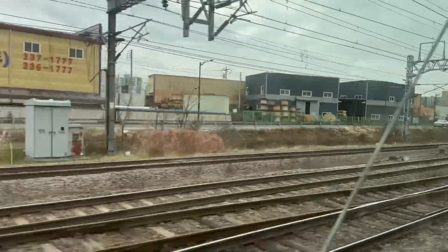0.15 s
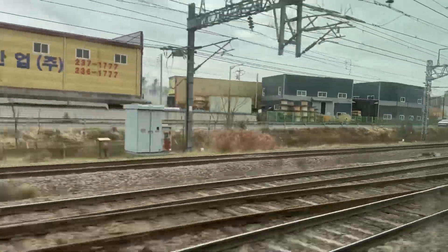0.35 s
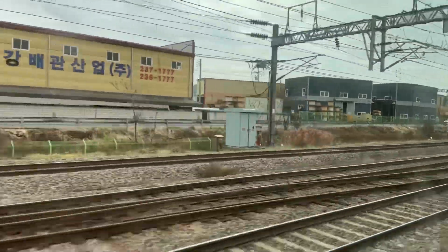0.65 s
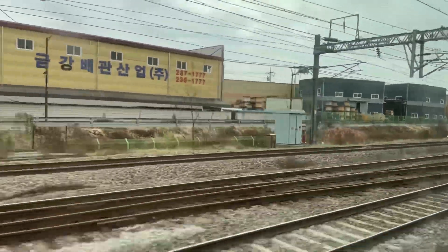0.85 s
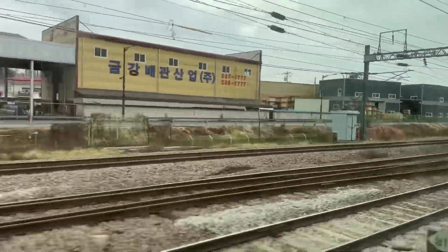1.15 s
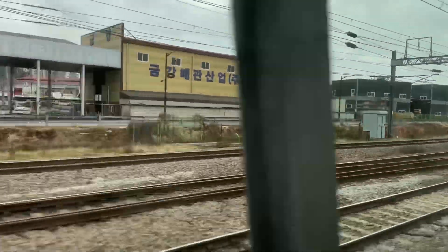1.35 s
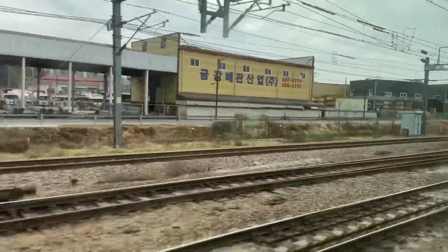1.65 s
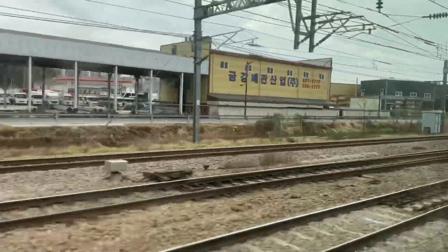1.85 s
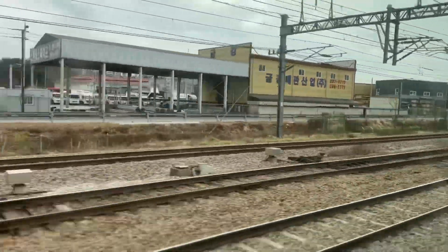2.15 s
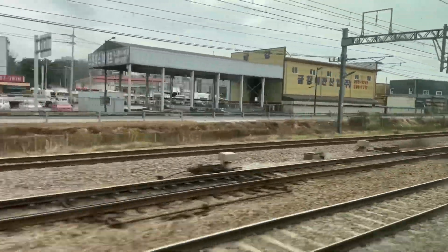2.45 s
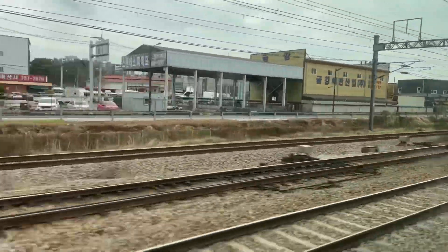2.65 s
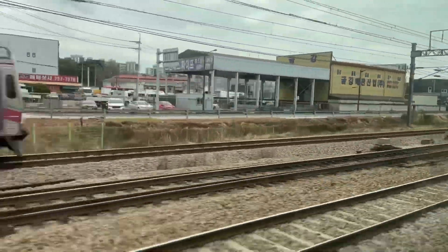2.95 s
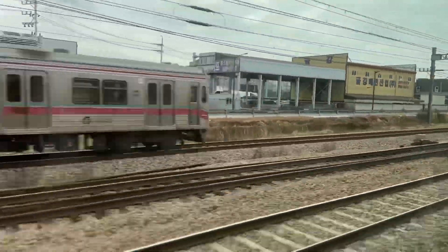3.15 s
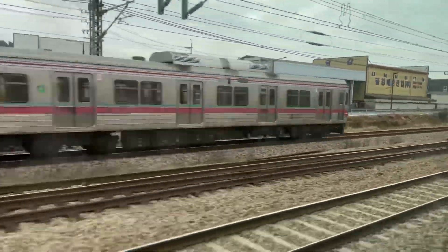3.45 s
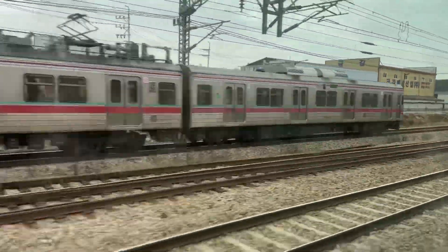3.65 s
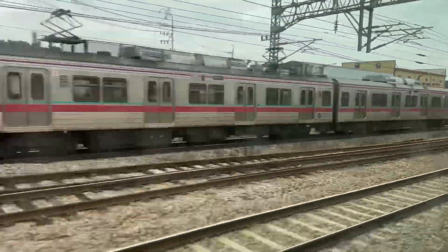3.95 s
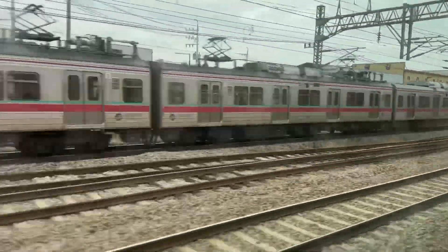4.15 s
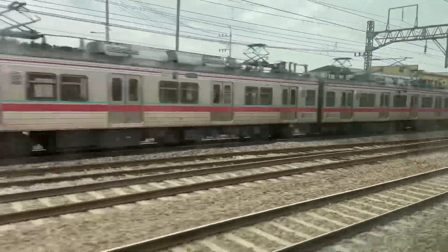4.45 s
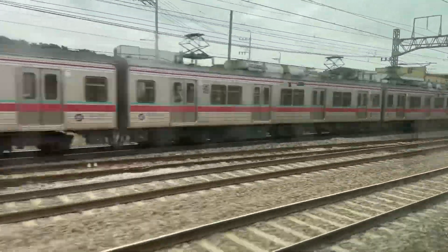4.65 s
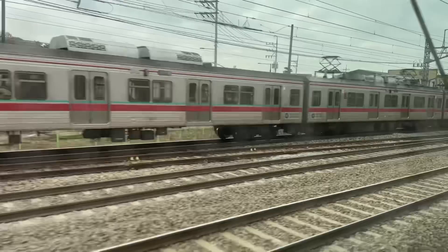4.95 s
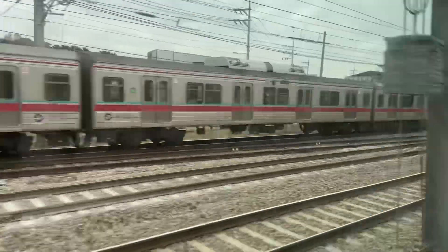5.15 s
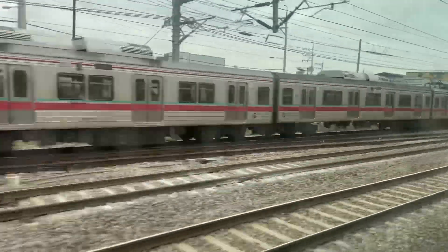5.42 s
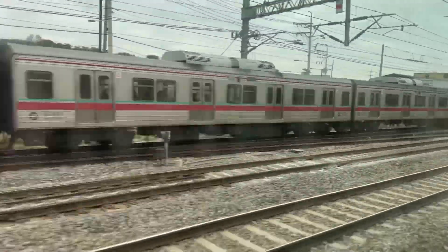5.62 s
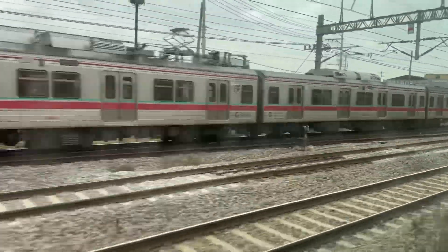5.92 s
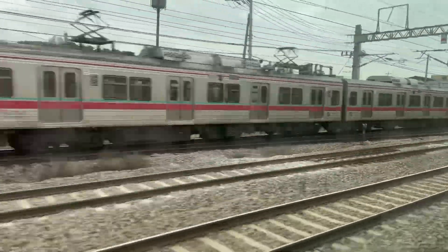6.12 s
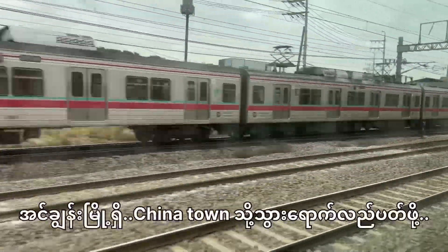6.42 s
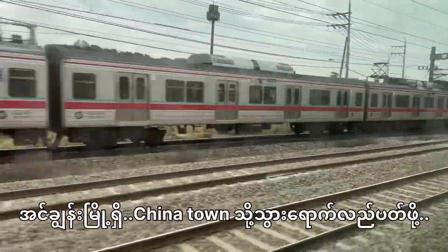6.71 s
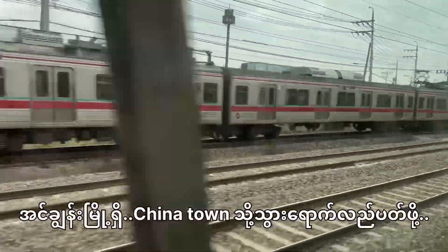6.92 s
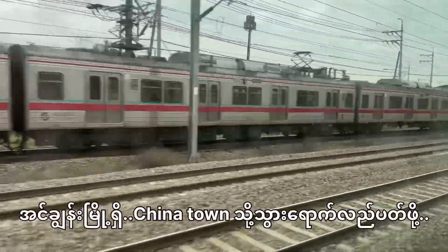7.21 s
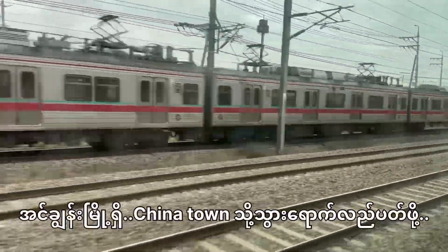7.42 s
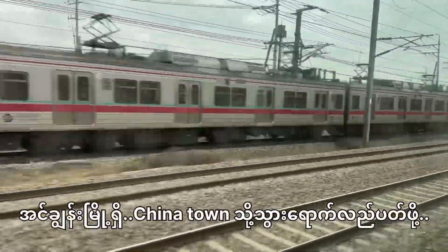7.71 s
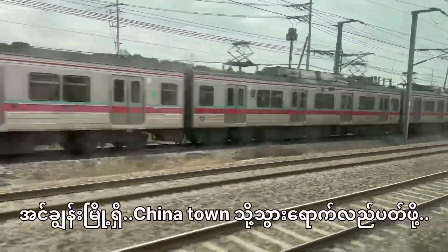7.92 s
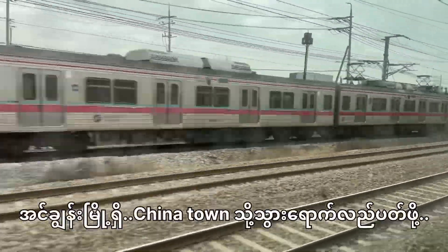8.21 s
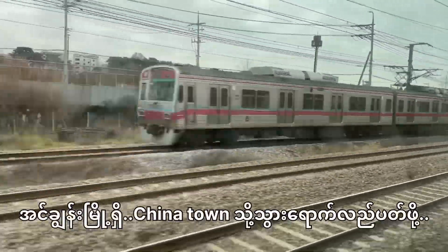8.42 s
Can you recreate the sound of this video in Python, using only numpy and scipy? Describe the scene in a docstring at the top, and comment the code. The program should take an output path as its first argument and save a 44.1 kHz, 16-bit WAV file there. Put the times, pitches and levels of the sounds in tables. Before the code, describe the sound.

A train gathers slight speed, heard from a seat inside. Bass-heavy rolling noise with floor boom surges gently under a faint, slowly climbing gear whine and wavering body hum. Paired thuds with soft steel clanks punctuate it irregularly. Small metal ticks and faint rustling join midway, then a brief high squeak slightly left. After a lull in joint knocks, a dense clatter and shudder closes over the ongoing rumble. Stereo, enclosed, little treble.

```python
"""Inside a passenger train that gathers a little speed: filtered noise makes the rolling, sines the tones.
At first a low drone tied to the wheel speed swells in, and soon wheels knock over rail joints, often in pairs.
From about 3 s loose fittings tick and jingle; near 4 s the drone changes pitch and soft rustles begin.
A panel squeaks just after 6 s, the joints pause from 7 s, and after 8 s they crowd as the body shudders.
All along, the gears whine and beat while climbing slowly, and the body hums with wavering strength."""
import sys
import numpy as np
from scipy import signal
from scipy.fft import irfft
from scipy.io import wavfile
from scipy.ndimage import uniform_filter1d, map_coordinates

SR = 44100
rng = np.random.default_rng(int(sys.argv[2]) if len(sys.argv) > 2 else 0)


def pcm_store(signal):
    """Save signal as 16-bit PCM."""
    levels = np.round(np.clip(np.atleast_2d(signal), -1, 1) * 32767)
    wavfile.write(sys.argv[1], SR, levels.astype(np.int16).T)


N = 377937
TIME = np.arange(N) / SR  # seconds
FREQ = np.maximum(np.arange(N // 2 + 1) * SR / N, 1)  # Hz, kept above zero for the logarithm

# Rolling: rocking of the carriage on its springs: t/s, shudder level/dB
SHUDDER_LEVEL = [(0, -32), (0.36, -29), (1.2, -40.5), (2.6, -33), (3.3, -42), (4.7, -35.5), (6.8, -36.5),
                 (7.8, -37), (8.25, -24), (8.57, -37)]
# long waves in the track: t/s, rumble level/dB
RUMBLE_LEVEL = [(0, -22), (0.6, -26), (1.2, -24.5), (1.9, -22.5), (2.8, -25), (3.3, -25.5), (3.75, -20),
                (4.2, -29.5), (4.8, -24), (5.6, -21), (6.4, -23), (7.1, -22), (7.7, -23.5), (8.57, -21.5)]
# shorter waves in the track: t/s, floor boom level/dB
BOOM_LEVEL = [(0, -31.5), (0.8, -26.5), (2.0, -27.5), (2.8, -27), (4.15, -27.5), (4.7, -24.5), (5.3, -24.5),
              (5.8, -23.5), (6.5, -24), (7.1, -23), (7.8, -26.5), (8.3, -22)]
# ringing wheels as they leak in: t/s, level/dB before WHEEL_RING_TRIM_DB
WHEEL_RING_LEVEL = [(0.0, -50.5), (0.58, -47), (1.75, -48.5), (2.9, -47), (3.6, -46), (4.6, -47),
                    (6.6, -47.5), (8.4, -48.5)]
# hiss that leaks in: t/s, level/dB before HISS_TRIM_DB
HISS_LEVEL = [(0.0, -59), (0.44, -57), (1.8, -57.5), (4.4, -55), (8.4, -55)]
# colour of the noise in the cabin: f/Hz, relative level per Hz/dB
CABIN_COLOUR = [(18, -36.5), (30, -30.5), (42, -6), (66, -1), (186, -7), (226, -10.5), (340, -17.5),
                (450, -22), (1050, -32), (1400, -35.5), (2200, -39.5), (3200, -49), (7200, -56),
                (9700, -67), (11500, -108)]
# resonances of the body and, higher up, of the wheels: f/Hz, width at half the lift/Hz, lift/dB
CABIN_RESONANCES = [(104.6, 11, -5), (178.6, 8.9, -0.5), (260, 48, -1.5), (364.3, 15, 5), (386, 17, -2),
                    (432, 14, 0.5), (587, 14, 4.5), (675, 41, -0.5), (901, 29, 3.5), (2163, 120, -1),
                    (2855, 220, 4), (3560, 210, 2)]
# how the ears differ: f/Hz, likeness/0-1, left minus right level/dB, lead of the left ear/rad
EAR_DIFFERENCES = [(60, 1, -0.5, 0), (201, 0.94, -.5, 0), (357, 0.97, 4, -0.4), (450, 0.6, -1, -1),
                   (635, 0.52, 0, 0.63), (1120, 0.04, 4.5, 0.1), (1290, 0.32, 0, -2.5), (2480, 0, -3, -2),
                   (3600, 0.22, 2, -3.5), (4240, 0.15, 0, 1), (6740, 0.1, 6.5, 1.5), (8650, 0.8, 1, 1.02)]

# Drone: pitch of each line that follows the wheel speed: cycles per turn of the wheel
DRONE_CYCLES_PER_TURN = [6, 7.29, 8, 9, 10, 12, 13, 14.58, 17]
# one row for each of those lines: level on the first stretch/dB, level on the second stretch/dB
DRONE_LEVELS = [(-45, -28), (-29, -44.5), (-34, -43), (-37, -36), (-30.5, -45), (-38.5, -39),
                (-34.5, -37.5), (-40, -40.5), (-53.5, -37.5)]

# Joints: wheels over gaps in the rail: t/s, strength/dB, clank relative to thud/dB, favoured floor f/Hz
RAIL_JOINTS = [(0.328, -14.5, -23, 370), (0.4, -13, -24, 310), (0.725, -19, -27, 240),
               (0.77, -18, -38, 240), (1.32, -19.5, -20, 370), (1.342, -18, -30, 305),
               (1.406, -18, -23, 220), (1.9, -22.5, -29, 305), (2.313, -17.5, -19.5, 175),
               (2.392, -13.5, -22, 175), (3.312, -18.5, -24, 370), (3.379, -20.5, -19.5, 230),
               (4.282, -17.5, -26, 240), (4.344, -15.5, -21, 307), (4.534, -23, -25, 590),
               (4.732, -20.5, -19, 135), (5.242, -15, -22.5, 135), (5.324, -14, -23, 310),
               (5.789, -17.5, -38, 135), (5.923, -25, -12, 240), (6.198, -19.5, -19, 175),
               (6.296, -20.5, -35, 370), (6.761, -23.5, -31, 590), (8.002, -22.5, -31, 305),
               (8.055, -17, -33, 368), (8.087, -18, -17.5, 370), (8.166, -17, -22, 365),
               (8.205, -20, -25, 305), (8.264, -18.5, -29, 305), (8.309, -20.5, -24, 590)]
# what a blow rings in the floor: f/Hz, relative level/dB, time to fall by 60 dB/s
FLOOR_RINGING = [(129, 10.5, 0.34), (177.5, 6, 0.42), (238.6, 6, 0.35), (310.2, 3.5, 0.27),
                 (368.3, 1.5, 0.38), (437, 0, 0.24), (478, -9.5, 0.096), (529, -2, 0.21), (598, -2.5, 0.34),
                 (699, -4, 0.28), (884, -10, 0.19), (1026, -16, 0.16)]
# diffuse ring of the body: f/Hz, relative level per Hz/dB
THUD_COLOUR = [(80, -17.5), (170, 4.5), (330, 4), (560, -8.5), (900, -12.5), (1400, -26.5), (3000, -73.5),
               (8000, -92.5)]
# diffuse ring of the steel under it: f/Hz, relative level per Hz/dB
CLANK_COLOUR = [(500, -29), (1100, 8), (2300, 3), (3500, -8), (7000, -15.5), (10000, -31), (12000, -59)]
# dips in the rail that set the floor booming: t/s, level/dB
RAIL_DIPS = [(0.15, -16.5), (0.3, -17.5), (2.3, -8.5), (3.83, -11), (5.44, -11), (6.11, -12.5), (7.13, -10),
             (8.12, -9.5)]
# ringing modes of the wheels: f/Hz, width at half amplitude/Hz, relative level/dB
WHEEL_RESONANCES = [(2147, 49, -1.5), (2770, 32, -6.5), (2838, 29, -9), (3550, 56, -11)]

# Knocks under the floor: t/s, level/dB, crack relative to knock/dB, time for the crack to fall by 60 dB/s
FLOOR_KNOCKS = [(0.331, -22.5, -23.5, .05), (0.405, -24, -29, .06), (1.409, -21.5, -21, .06),
                (2.318, -25.5, -22, .07), (5.998, -21, -14, 0.089), (7.365, -41, 1, 0.13),
                (7.54, -28.5, -9.5, 0.23), (8.002, -25, -22, 0.048), (8.263, -19.5, -14, 0.073)]
# what the knocks ring: f/Hz, relative level/dB, time to fall by 60 dB/s
KNOCK_RINGING = [(285.2, 4, 0.13), (385, 2.5, 0.13), (476, -10, 0.14), (614, -9, 0.043), (625, -4, 0.091),
                 (740, -12, 0.11), (1000, -28, 0.032)]

# Fittings: ticks: t/s, level before a common lift/dB, time to fall by 60 dB/s
FITTING_TICKS = [(2.932, -52.5, 0.043), (3.294, -52, 0.13), (4.899, -58, 0.49), (5.242, -52.5, 0.23),
                 (5.389, -56, 0.22), (5.772, -57, 0.24), (6.711, -53, 0.1), (6.793, -60, 0.15),
                 (7.369, -64, .15), (7.578, -55, .18), (7.909, -57, 0.23), (8.088, -60, .2),
                 (8.262, -55, 0.098), (8.346, -49.5, 0.2)]
# colour of the ticks: f/Hz, relative level per Hz/dB
TICK_SPECTRUM = [(1500, -33), (2400, -18), (3500, 7), (6000, 1.5), (7600, 2.5), (8800, 1), (11000, -31),
                 (15000, -17)]
# a small metal part that jingles when shaken: t/s, level/dB, time to fall by 60 dB/s
METAL_JINGLES = [(3.285, -37, 0.14), (4.897, -39.5, 0.27), (7.905, -44, 0.17)]
# soft rustles: t/s at the middle, level/dB, half length/s
SOFT_RUSTLES = [(3.85, -60, .06), (4.317, -51.5, 0.063), (4.386, -46.5, 0.037), (5.436, -60, 0.081)]
# colour of the rustles: f/Hz, relative level per Hz/dB
RUSTLE_SPECTRUM = [(1500, -25.5), (3500, 2), (6500, 10), (9000, 6.5), (11000, -18), (15500, 4)]
# slips of the trim, each a tiny squeak: t/s at the middle, f/Hz, level/dB, half length/s
TRIM_SLIPS = [(6.11, 5850, -49, 0.0045), (6.123, 5880, -51, .004), (6.137, 5870, -53, 0.0095),
              (6.165, 5900, -54, .003)]

# Gears of two axles run slightly apart: multiple of the mesh rate, level at the start/dB, fade per s/dB
GEAR_LINES = [(.8, -51, 1.2), (1, -51.5, 0), (1.004, -53, 0), (1.395, -55, 1.3)]
# wavering tones of the body: f/Hz, level/dB
BODY_TONES = [(372, -42.5), (2030, -76)]

# Rolling: the roar grows by a share of the boom's rise above its mean, both in dB
ROAR_DB, ROAR_FOLLOWS_BOOM = -32, 0.19
HISS_TRIM_DB, WHEEL_RING_TRIM_DB = 2, 1.48
# Speed: teeth meeting per second, and teeth that meet in one turn of a wheel
MESH_HZ, MESH_HZ_PER_S, MESHES_PER_WHEEL_TURN = 705, 5.9, 73
# Drone: start and softness of the second stretch; slowness of the first swell
STRETCH_S, STRETCH_BLEND_S, DRONE_SWELL_S = 3.84, 0.27, 0.66
# Joints: a blow of HARD_BLOW_DB rises in JOINT_RISE_S, weaker ones more slowly
THUD_T60_S, CLANK_T60_S, JOINT_RISE_S, HARD_BLOW_DB = 0.4, 0.22, 0.0018, -18
# the wheel bounces once and lands again, weaker
REBOUND_S, REBOUND_DB = 0.02, -5.5
# the struck spot favours floor modes near one pitch: lift, and reach in octaves
SPOT_DB, SPOT_OCTAVES = 9, 0.25
# Floor boom, with its level after a joint relative to the blow
BOOM_HZ, BOOM_WIDTH_HZ, BOOM_T60_S, BOOM_RISE_S, JOINT_BOOM_DB = 172, 45, 0.36, 0.024, -9
# Singing wheels: level when rolling, level after a joint relative to the blow, and ring time
SING_DB, SING_JOINT_DB, SING_T60_S = -58.5, -37.5, 0.39
JINGLE_HZ, JINGLE_WIDTH_HZ = 2340, 380
TOP_HZ = 15700


def rolling():
    """Rough rail shakes the body: low bands come through the springs, high bands through the walls."""
    lift_db = sum(db / (1 + (2 * (FREQ - hz) / width) ** 2) for hz, width, db in CABIN_RESONANCES)
    cabin = colour(CABIN_COLOUR) * undb(lift_db) * standing_waves(spacing_hz=14)
    edges = [0, 48, 120, 280, 1300, 3000, SR]  # Hz, between the six bands
    bands = [field(cabin * (FREQ >= low) * (FREQ < high)) for low, high in zip(edges, edges[1:])]
    shudder, rumble, boom, roar, wheels, hiss = bands
    [shudder_db], [rumble_db], [boom_db] = curves(SHUDDER_LEVEL), curves(RUMBLE_LEVEL), curves(BOOM_LEVEL)
    [wheels_db], [hiss_db] = curves(WHEEL_RING_LEVEL), curves(HISS_LEVEL)

    # slightly out-of-round wheels throb once a turn
    throb = np.sin(2 * np.pi * wheel_turns())
    through_springs = even(shudder, span=0.62) * undb(shudder_db)
    through_springs = through_springs + even(rumble, span=0.11) * undb(rumble_db + 0.98 * walk(14))
    through_springs = through_springs + even(boom, span=0.11) * undb(boom_db + 1.88 * walk(14))

    # the contact point roams over the tread, so the wheels' ring drifts and grates
    wheels = wander(wheels, share=0.007) * undb(0.88 * walk(70))
    # patches of rougher rail make roar, wheels and hiss flutter together
    patches = walk(14)
    roar_db = ROAR_DB + ROAR_FOLLOWS_BOOM * (boom_db - np.mean(boom_db))
    through_walls = roar * undb(roar_db + 0.58 * patches)
    through_walls = through_walls + wheels * undb(wheels_db + WHEEL_RING_TRIM_DB + 0.26 * patches)
    through_walls = through_walls + hiss * undb(hiss_db + HISS_TRIM_DB + 0.38 * patches)
    return through_springs * undb(0.34 * throb) + through_walls


def drone():
    """Low lines that follow the wheel speed, most at whole multiples of its turns, make a drone."""
    turns = wheel_turns()
    second = 0.5 + 0.5 * np.tanh((TIME - STRETCH_S) / STRETCH_BLEND_S)  # goes from 0 to 1
    lines = np.zeros(N)  # alike at both ears
    for cycles, (first_db, second_db) in zip(DRONE_CYCLES_PER_TURN, DRONE_LEVELS):
        level_db = first_db + (second_db - first_db) * second + 1.7 * walk(3)
        phase = 2 * np.pi * (cycles * turns + rng.random()) + 0.25 * walk(3)
        lines += undb(level_db) * np.sin(phase)
    return np.sqrt(2) * lines * (1 - np.exp(-TIME / DRONE_SWELL_S))


def joints():
    """Each wheel drops into a gap and bounces: the floor rings, the body thuds, the steel clanks."""
    rebounds = np.add(RAIL_JOINTS, [REBOUND_S, REBOUND_DB, 0, 0])
    s, db, clank_db, spot_hz = np.vstack([RAIL_JOINTS, rebounds]).T
    rise = JOINT_RISE_S * undb(HARD_BLOW_DB - db)
    # broadcast gives every blow the same decay time
    thud_shape = blows(np.broadcast(s, db, THUD_T60_S, rise))
    clank_shape = blows(np.broadcast(s, db + clank_db, CLANK_T60_S, rise))
    thud = even(field(colour(THUD_COLOUR)), span=0.034) * thud_shape
    clank = field(colour(CLANK_COLOUR)) * clank_shape
    chatter = undb(1.83 * walk(130))
    floor = ring(np.transpose([s, db, spot_hz]), FLOOR_RINGING, SPOT_DB, rise_s=0.0013)
    return undb(-19.0) * floor + chatter * (undb(-7.0) * thud + undb(-3.0) * clank)


def booming():
    """Dips and joints set the main resonance of the floor swelling for a moment."""
    resonance = 1 / (1 + (2 * (FREQ - BOOM_HZ) / BOOM_WIDTH_HZ) ** 2)
    jolts = list(RAIL_DIPS) + [(s, db + JOINT_BOOM_DB) for s, db, *_ in RAIL_JOINTS]
    swells = blows([(s, db, BOOM_T60_S, BOOM_RISE_S) for s, db in jolts])
    return even(field(resonance), span=0.041) * swells


def knocks():
    """Hollow knocks with a crack: some sharpen the first contact at a joint, others come alone."""
    cracks = blows([(s, db + crack_db, t60, 0.0006) for s, db, crack_db, t60 in FLOOR_KNOCKS])
    crack = field(colour(CLANK_COLOUR)) * cracks
    # with no spot lift, the favoured pitch of 1 Hz plays no part
    hollow = ring([(s, db, 1) for s, db, *_ in FLOOR_KNOCKS], KNOCK_RINGING, spot_db=0, rise_s=0.00036)
    # small bumps come by chance
    bumps = [(when * TIME[-1], -53 + 5.9 * strength, 150 + 300 * spot)
             for when, strength, spot in rng.random(size=(40, 3))]
    rattle = field(colour(CLANK_COLOUR)) * blows([(s, db + 0.5, 0.15, 0.007) for s, db, _ in bumps])
    return hollow + crack + ring(bumps, FLOOR_RINGING, SPOT_DB, rise_s=0.004) + rattle


def singing():
    """The steel wheels ring faintly as they roll, and louder after each joint."""
    modes = sum(undb(db) / (1 + (2 * (FREQ - hz) / width) ** 2) for hz, width, db in WHEEL_RESONANCES)
    struck = blows([(s, db + SING_JOINT_DB, SING_T60_S, 0.004) for s, db, *_ in RAIL_JOINTS])
    rolled = undb(SING_DB + 1.4 * walk(11))
    return field(modes) * np.hypot(rolled, struck)


def fittings():
    """Shaken trim ticks and jingles in dying bursts; something soft rustles in tiny slips."""
    tick_shape = blows([(*tick, 0.0015) for tick in FITTING_TICKS])
    ticks = field(colour(TICK_SPECTRUM)) * tick_shape * undb(5 + 2.0 * walk(190))
    metal = 1 / (1 + (2 * (FREQ - JINGLE_HZ) / JINGLE_WIDTH_HZ) ** 2)
    jingles = field(metal) * blows([(*jingle, 0.004) for jingle in METAL_JINGLES])
    rubbing = sum(undb(db) * np.exp(-((TIME - s) / half) ** 2) for s, db, half in SOFT_RUSTLES)
    # faint creaks come and go all the time
    creaks = undb(-85.5 + 2.8 * walk(16))
    rustles = field(colour(RUSTLE_SPECTRUM)) * (rubbing + creaks) * undb(1.4 * walk(300))
    return ticks + jingles + rustles


def squeak():
    """Two panels stick and slip in short jerks, each a brief high tone, nearer the left ear."""
    wobbly_time = np.cumsum(1 + 0.011 * walk(900)) / SR
    slips = np.zeros(N)
    for s, hz, db, half in TRIM_SLIPS:
        slips += np.sin(2 * np.pi * hz * wobbly_time) * undb(db) * np.exp(-((TIME - s) / half) ** 2)
    return slips * undb(2 * walk(150)) * undb([[3], [-2]])  # left, right


def gears():
    """Meeting teeth whine at multiples of the mesh rate; close pitches beat and climb with the speed."""
    return sum(tone(multiple * mesh_rate(), db - fade * TIME, waver=0.33)
               for multiple, db, fade in GEAR_LINES)


def body_hum():
    """Two fixed pitches of the carriage body hum with wavering strength."""
    return sum(tone(hz, db, waver=0.7) for hz, db in BODY_TONES)


def mesh_rate():
    """Teeth meeting per second: follows the speed of the train."""
    return MESH_HZ + MESH_HZ_PER_S * TIME


def wheel_turns():
    """Turns that a wheel has made so far."""
    return np.cumsum(mesh_rate() / MESHES_PER_WHEEL_TURN) / SR


def standing_waves(spacing_hz):
    """The many narrow modes of the cabin: a fixed fine ripple, strongest in the middle pitches."""
    hz = np.arange(0, SR / 2, spacing_hz)
    ripple = np.interp(FREQ, hz, rng.standard_normal(len(hz)))
    middle = FREQ / (FREQ + 700) / (1 + (FREQ / 1600) ** 2)
    return undb(4.5 * ripple * middle)


def field(gain):
    """Diffuse noise of a given colour, rms 1: long waves reach both ears alike, most short ones do not."""
    likeness, pan_db, lead = spectra(EAR_DIFFERENCES)
    likeness = np.clip(likeness, 0, 0.999)
    real, imaginary = rng.standard_normal((2, 2, len(FREQ)))
    noise = (real + 1j * imaginary) * gain
    mid, side = noise * np.sqrt([1 + likeness, 1 - likeness])
    ears = np.array([(mid + side) * np.exp(1j * lead), mid - side])
    return unit(irfft(ears * undb([pan_db / 2, -pan_db / 2]), N))


def ring(hits, modes, spot_db, rise_s):
    """Hits (t/s, level/dB, favoured f/Hz) swing the modes; higher modes differ more between the ears."""
    age, out = TIME[:SR // 3], np.zeros((2, N + SR))
    hz, mode_db, t60 = np.transpose(modes)
    decay = np.exp(-np.log(1000) * age / t60[:, None]) * (1 - np.exp(-age / rise_s))
    chances = rng.standard_normal((len(hits), 3, len(hz)))
    for (s, db, spot_hz), (detune, sign, side) in zip(hits, chances):
        swing = np.sin(2 * np.pi * np.outer(hz * (1 + 0.014 * detune), age)) * decay
        octaves_away = np.log2(hz / spot_hz)
        lift_db = spot_db * np.exp(-(octaves_away / SPOT_OCTAVES) ** 2)
        size = np.sign(sign) * undb(db + mode_db + lift_db)
        angle = np.pi / 4 + side * hz / 1100  # 45 degrees is the middle
        ears = size * np.array([np.cos(angle), np.sin(angle)])
        out[:, int(s * SR):][:, :len(age)] += np.sqrt(2) * ears @ swing
    return out[:, :N]


def blows(rows):
    """Envelope of blows (t/s, level/dB, t60/s, rise/s) that swell and die away; their powers add."""
    power = np.zeros(N)
    for s, db, t60, rise in rows:
        start = int(s * SR)
        age = TIME[:SR][:N - start]  # at most one second
        shape = undb(db - 60 * age / t60) * (1 - np.exp(-age / rise))
        power[start:][:len(age)] += shape ** 2
    return np.sqrt(power)


def tone(hz, db, waver):
    """A line whose strength and phase wander, a little differently at each ear."""
    carrier = np.exp(2j * np.pi * np.cumsum(hz * np.ones(N)) / SR)
    shared = 1 + waver * (walk(9) + 1j * walk(9))
    ears = [(carrier * (shared + waver * (walk(5.5) + 1j * walk(5.1)))).real for _ in range(2)]
    return undb(db) * unit(np.array(ears))


def wander(x, share):
    """Lets every pitch in a sound drift by a small share, by reading it at an uneven pace."""
    place = np.cumsum(1 + share * walk(7))
    return np.array([map_coordinates(ear, [place], mode="mirror") for ear in x])


def even(x, span):
    """Noise whose power stays level over the given span of seconds."""
    return x / np.sqrt(uniform_filter1d(np.mean(x ** 2, axis=0), int(span * SR)))


def walk(rate):
    """Random levels held for 1 / rate seconds and smoothed twice; spread near 1."""
    k = int(SR / rate)
    steps = np.repeat(rng.standard_normal(N // k + 1), k)
    return 1.6 * uniform_filter1d(uniform_filter1d(steps, k), k)[:N]


def curves(table):
    """The columns of a table, joined by straight lines in time."""
    s, *columns = np.transpose(table)
    return [np.interp(TIME, s, column) for column in columns]


def spectra(table):
    """The columns of a table, joined by straight lines over log frequency."""
    hz, *columns = np.transpose(table)
    return [np.interp(np.log(FREQ), np.log(hz), column) for column in columns]


def colour(table):
    """Gain at every frequency from rows of f/Hz, level/dB."""
    return undb(spectra(table)[0])


def undb(db):
    """Decibels to gain."""
    return 10 ** (np.asarray(db) / 20)


def unit(x):
    """Scale to rms 1."""
    return x / np.sqrt(np.mean(x ** 2))


def scene():
    """Everything heard inside the carriage, added together."""
    track = rolling() + drone() + joints() + booming() + knocks() + singing()
    cabin = fittings() + squeak() + gears() + body_hum()
    return track + cabin


def record(dry):
    """A steep low-pass filter removes the treble above TOP_HZ."""
    return signal.sosfilt(signal.ellip(8, 0.2, 70, TOP_HZ, fs=SR, output="sos"), dry)


dry = scene()
out = record(dry)
pcm_store(out)
```